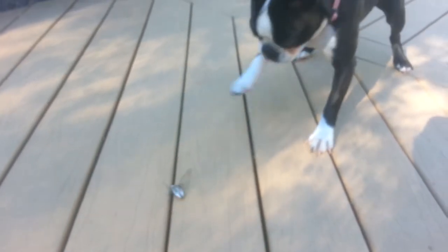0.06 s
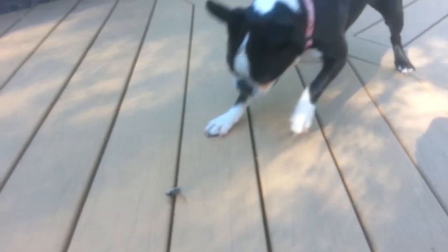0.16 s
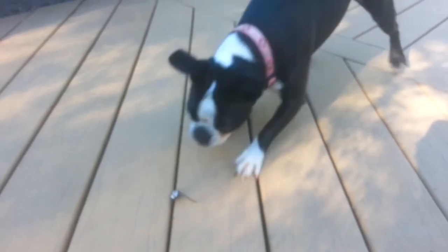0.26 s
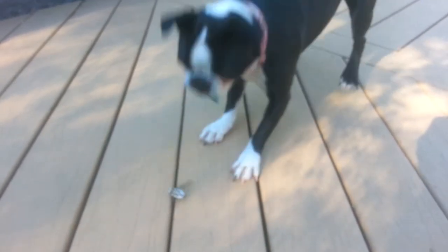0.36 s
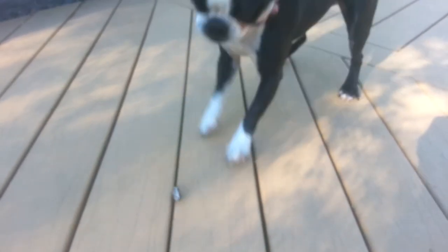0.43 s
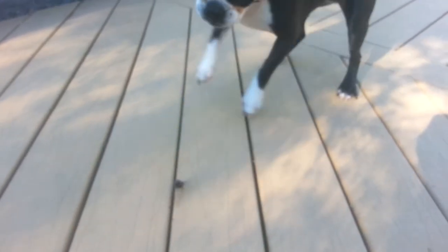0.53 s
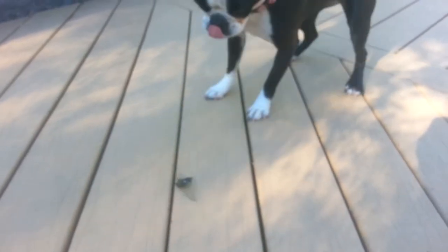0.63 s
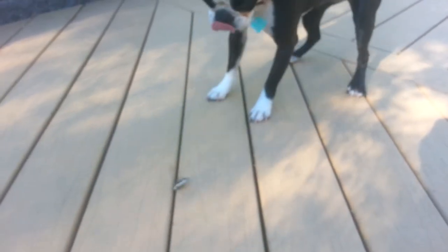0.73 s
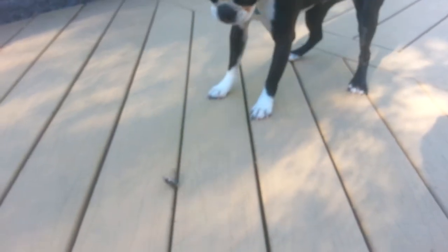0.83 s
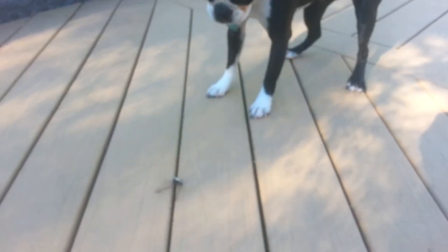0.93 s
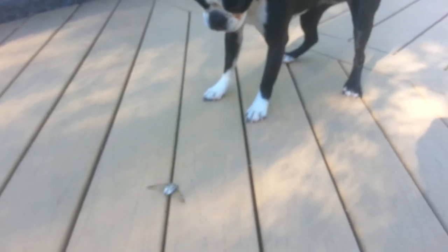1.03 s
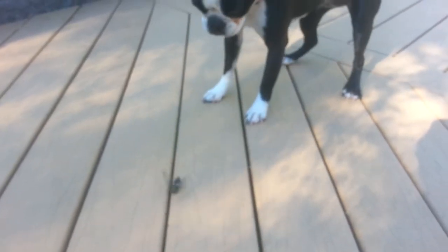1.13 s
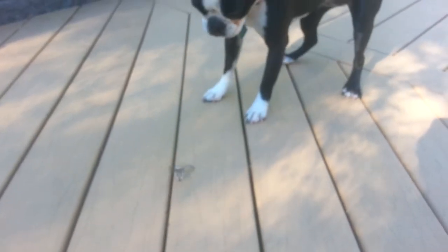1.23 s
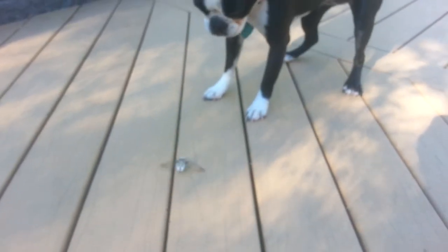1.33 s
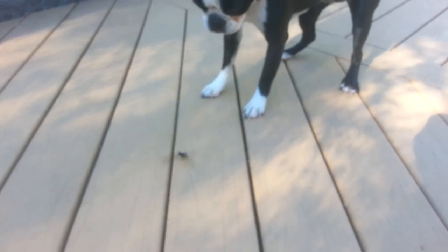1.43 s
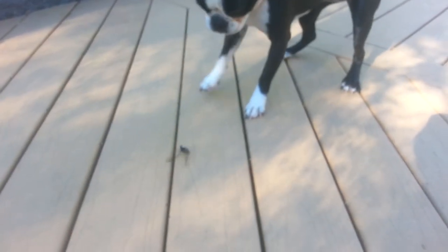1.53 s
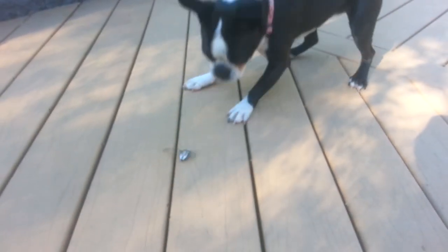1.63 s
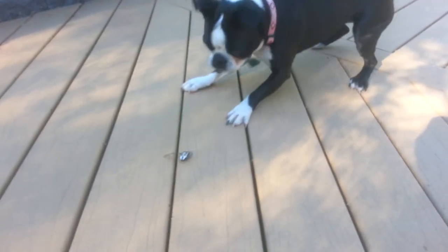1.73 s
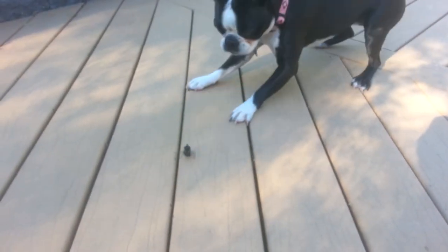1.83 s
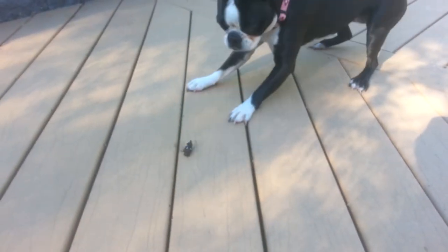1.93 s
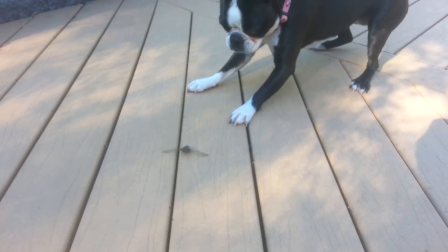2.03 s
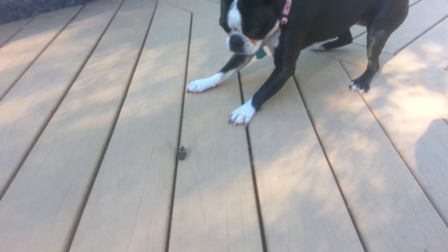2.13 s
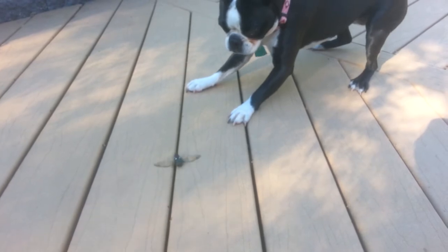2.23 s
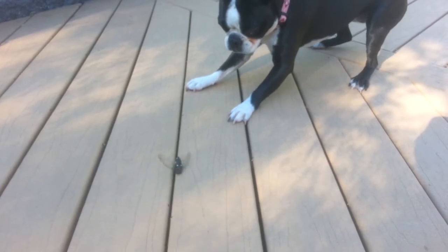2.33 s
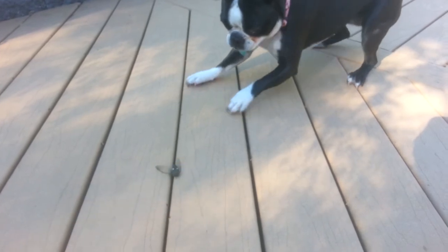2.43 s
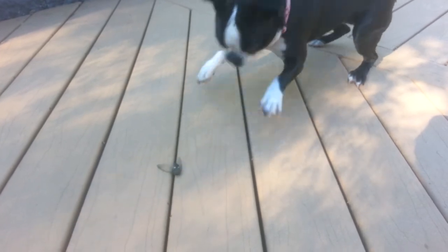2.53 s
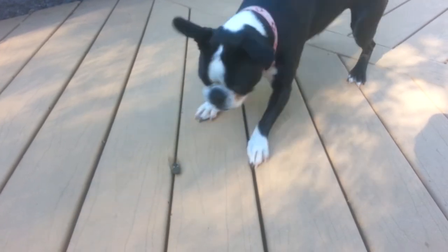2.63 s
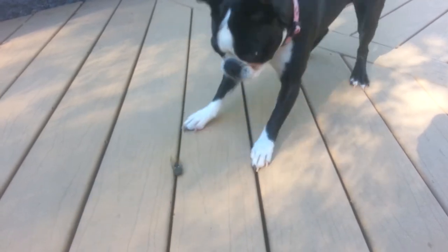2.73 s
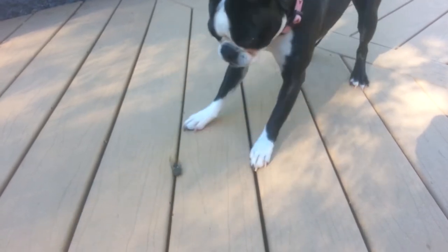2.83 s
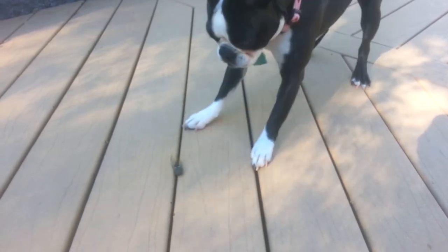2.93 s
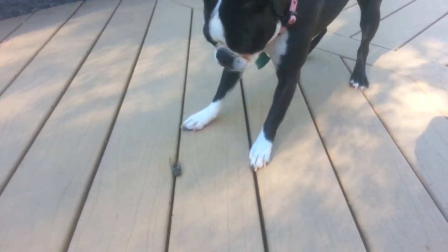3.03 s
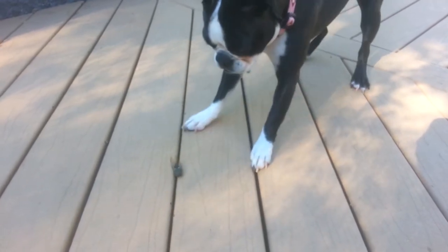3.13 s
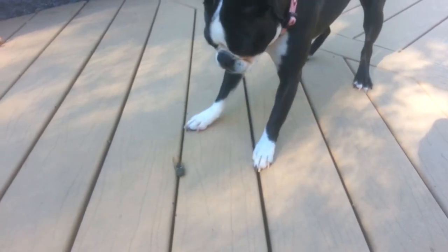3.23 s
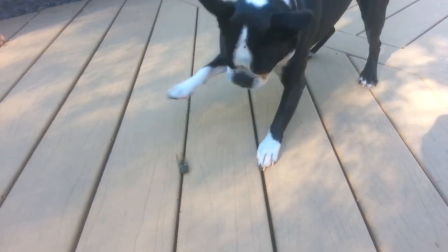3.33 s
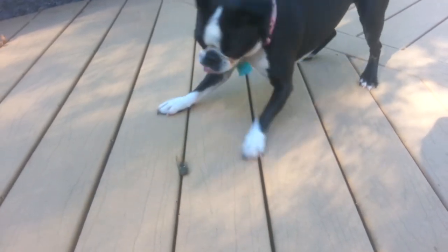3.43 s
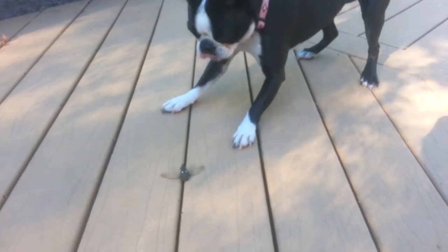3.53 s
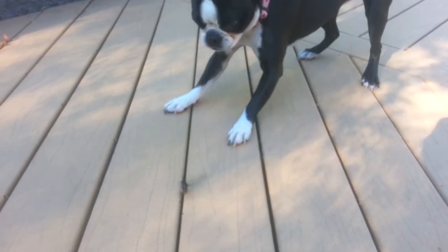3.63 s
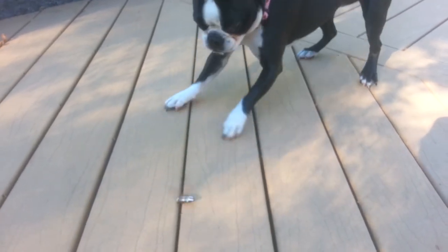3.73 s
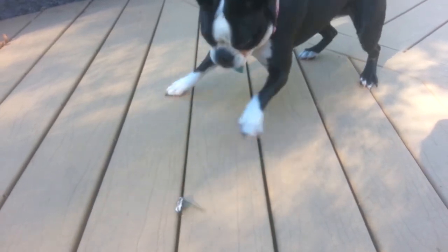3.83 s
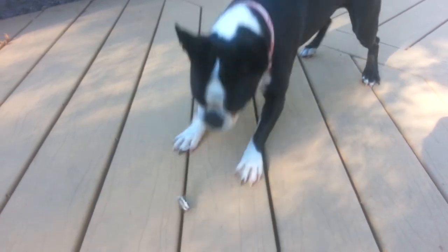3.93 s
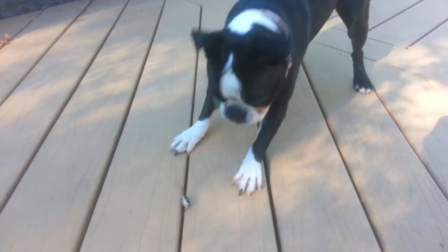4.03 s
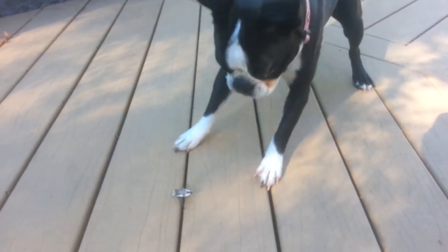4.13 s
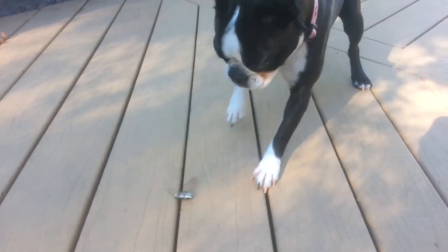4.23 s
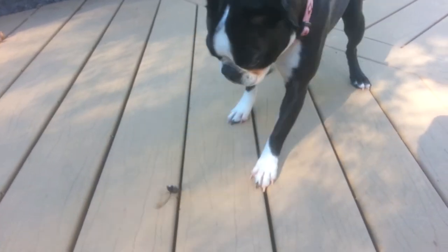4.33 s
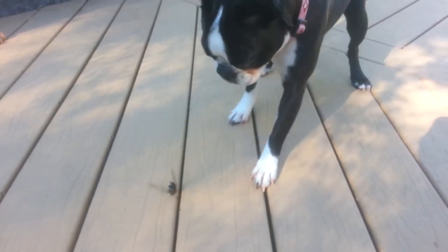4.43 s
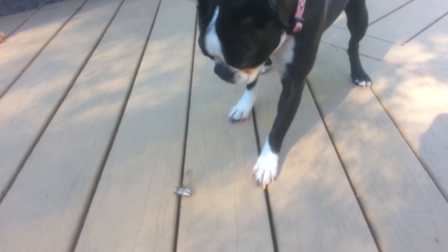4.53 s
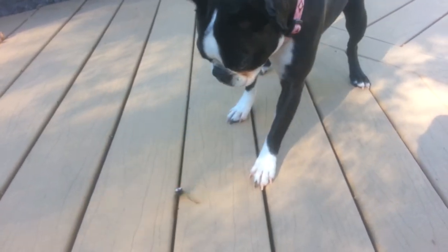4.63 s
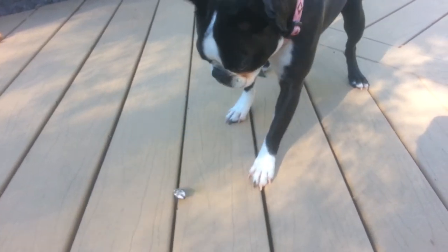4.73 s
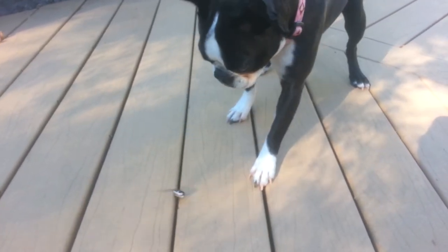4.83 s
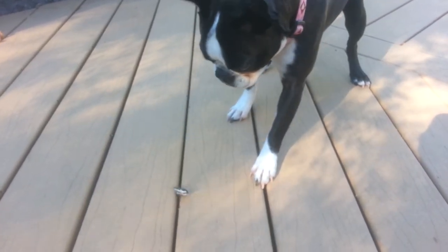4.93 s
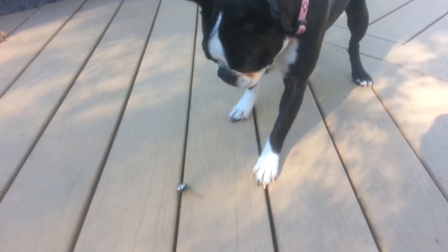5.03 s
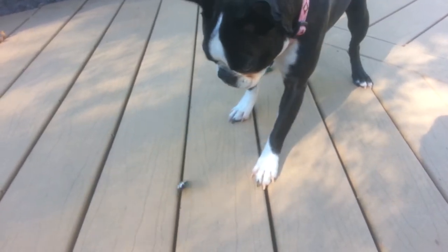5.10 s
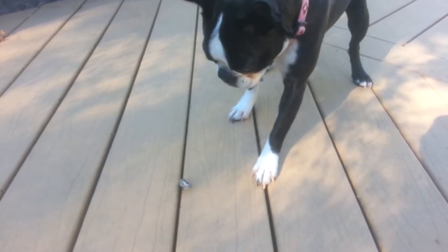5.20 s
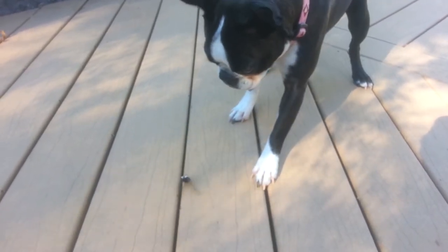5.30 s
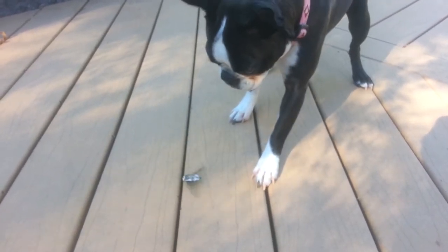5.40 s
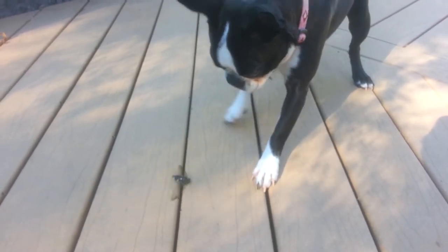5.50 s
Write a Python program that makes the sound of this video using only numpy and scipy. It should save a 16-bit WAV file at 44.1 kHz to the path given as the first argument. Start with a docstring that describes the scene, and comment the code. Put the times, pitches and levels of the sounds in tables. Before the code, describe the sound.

Close by on an outdoor wooden deck, a dog pounces in short bursts: claws click, boards thud, pads scuff and metal collar tags clink. Between the landings a cicada scrabbles and flicks its dry wings against the wood. After the heaviest landing, the insect fires a brief, loud run of sharp clicks, then rustles on and fades. Soft air and distant insects continue underneath.

```python
"""A dog pounces at a cicada on a wooden deck: claws click, boards thud, pads scuff, collar tags jingle.
From 0.5 s the cicada scrabbles and flicks its wings against the wood.
The paws land again near 1.6, 2.6, 3.4 and 4 s. Pawed, the cicada fires nine tymbal clicks from 4.1 s,
then brushes and rustles on, fading. Soft outdoor air and far insects sound throughout."""
import sys
import numpy as np
from scipy import signal
from scipy.fft import rfft, irfft
from scipy.io import wavfile

SR = 44100
rng = np.random.default_rng(int(sys.argv[2]) if len(sys.argv) > 2 else 0)


def int16_out(signal):
    """Quantize to a 16-bit WAV file."""
    q = np.round(np.clip(np.atleast_2d(signal).T, -1, 1) * 32767)
    wavfile.write(sys.argv[1], SR, q.astype(np.int16))


N = 245195

# spectrum of a dry wing on wood: (frequency [Hz], level [dB])
WING_SPECTRUM = [(200, -15), (700, 1.5), (1300, 2.5), (2300, -2), (3500, 9), (5000, 3.5), (7500, -1),
                 (10000, -3.5), (12500, 0), (14500, 2)]
# likeness of left and right for close sounds: (frequency [Hz], coherence [0-1])
NEAR_COHERENCE = [(60, 1), (650, 0.98), (1400, 0.48), (3000, 0.2), (7000, 0.16)]
ABDOMEN_HZ, BAND_EDGE_HZ = 3490, 14850


def paws(soften_db_per_oct=2, settle_s=.024, settle_db=-8, skid_s=.022, left_db=3):
    """Each landing: the claws crack, the plank thuds, the weight settles with a duller thud, the paw skids."""
    # (time [s], claw level [dB], claw treble [dB], thud level [dB], hardness [dB/octave], skid level [dB])
    landings = [(0.0291, -42.5, 1.5, -56, 1.5, -57), (0.0799, -29, -4, -47, 1, -49),
                (0.1363, -18.5, -7, -25.5, 13, -41.5), (0.194, -25, -12.5, -36.5, 4, -46),
                (0.2812, -26, -7.5, -30, 5, -34.5), (0.3271, -43, -19, -31, 4, -50),
                (0.3968, -38, -6.5, -57, 2, -53), (0.4193, -25, -19.5, -39.5, 4.5, -39.5),
                (0.6182, -25.5, -13, -40.5, -1, -40.5), (1.6392, -27, -8.5, -33, 4, -39.5),
                (1.7263, -25.5, -13, -33.5, 8.5, -48), (2.6135, -26.5, -7, -29.5, -1.5, -40),
                (2.6217, -25, -12, -25.5, 1, -32.5), (2.735, -26, -49, -38, 7.5, -51),
                (3.3498, -39.5, -12.5, -47.5, 4, -49), (3.4246, -21.5, -9.5, -26, 5, -41),
                (3.9575, -40.5, -6, -33, 4, -35), (3.9928, -21.5, -11, -18, 8.5, -36.5),
                (4.1055, -30.5, -10, -35.5, -7, -41), (4.1732, -39, 3, -39.5, 4.5, -47)]
    # harder landings knock deeper: (hardness [dB/octave], frequency [Hz])
    knock_pitch = [(2.5, 3570), (7, 1400)]
    contacts, planks = np.zeros((2, 2, N))
    for s, claw_db, treble_db, thud_db, hardness, skid_db in landings:
        knock_hz = np.interp(hardness, *np.transpose(knock_pitch))
        tilt = hardness - soften_db_per_oct
        add(contacts, s, gain_of(claw_db) * claw(treble_db, knock_hz))
        add(planks, s, gain_of(thud_db) * board(tilt))
        add(planks, s + settle_s, gain_of(thud_db + settle_db) * board(tilt - 3.5))
        offset_s, skid = scuff(rise_s=.01, fall_s=.038, treble_db=-11.5, rasp_hz=knock_hz, rasp_db=1)
        add(contacts, s + skid_s + offset_s, gain_of(skid_db) * skid)
    return panned(contacts, left_db) + planks


def claw(treble_db, knock_hz, crack_s=.0061, rattle_db=-16, rattle_s=.01, knock_db=3.5):
    """A hard claw cracks on wood, with a hollow knock and a short rattle."""
    # claw on wood: (frequency [Hz], level [dB])
    spectrum = [(250, -18.5), (600, -9), (1100, -7.5), (1600, -0.5), (2600, -3), (3700, 1.5), (4700, -4.5),
                (7000, -6.5), (10000, -13), (14500, -18.5)]
    t = np.arange(SR // 10) / SR
    envelope = np.exp(-t / crack_s) + gain_of(rattle_db) * np.exp(-t / rattle_s)
    noise = rng.standard_normal((2, len(t))) * envelope
    crack = coloured(noise, spectrum, treble_db, (knock_hz, knock_db), ripple_db=2.5)
    return as_hit(left_late(paired(crack, NEAR_COHERENCE))) * np.hypot(1, gain_of(treble_db))


def board(tilt_db_per_oct, detune=.041):
    """Bending waves in a plank: the high ones arrive first, the low ones build up late."""
    # plank modes: (frequency [Hz], level [dB], t60 [s])
    modes = [(81, -15, 0.29), (121.2, -4.5, 0.23), (147, 1.5, 0.21), (177.9, -2.5, 0.24),
             (195.4, 0.5, 0.15), (245, 0, 0.12), (296.4, -5, 0.26), (355, 1, 0.12), (422, 0, 0.09),
             (464.2, 3.5, 0.1), (520.7, 2, 0.11), (576.5, -1, 0.083), (660, -6, 0.06), (795, -13.5, 0.098)]
    hz, db, t60_s = np.transpose(modes)[:, :, None]
    hz = hz * (1 + detune * rng.uniform(-1.02, 1, hz.shape))
    t = np.arange(SR // 5) / SR
    build_s = 20 / hz ** 1.5
    onset = 1 - np.exp(-(t / build_s) ** 2)
    decay = gain_of(db + tilt_db_per_oct * np.log2(hz) - 60 * t / t60_s)
    ringing = onset * decay * np.exp(2j * np.pi * hz * t)
    phase = 2 * np.pi * rng.random(len(hz)) + .2 * rng.standard_normal((2, len(hz)))
    return as_hit((np.exp(1j * phase) @ ringing).real)


def scuffs(left_db=2.5):
    """Pads and claws drag over the wood; each stroke rasps at its own pitch."""
    # (peak time [s], rise [s], level [dB], treble [dB], rasp frequency [Hz], rasp height [dB])
    drags = [(.58, .022, -34.5, -7.5, 2080, 6), (.625, 0.026, -29.5, -3.5, 2600, 6),
             (1.642, .015, -31.5, -5.5, 3700, -5), (1.709, 0.018, -24.5, -16.5, 2730, 13.5),
             (2.455, 0.023, -32.5, -19.5, 860, 3.5), (2.518, 0.0092, -32.5, -27, 3150, 9),
             (2.70, 0.03, -32.5, -14, 3630, -5), (2.742, 0.0085, -31, -26, 1510, 10),
             (3.41, 0.019, -36.5, -3.5, 3500, 1), (3.485, .045, -33, -11, 3500, 3),
             (3.831, 0.028, -25, -13.5, 2140, 3), (3.896, 0.0071, -38, -12, 3020, 17),
             (4.051, 0.0066, -24.5, -19, 2680, 14.5), (4.159, 0.034, -36.5, -2, 2260, 15)]
    out = np.zeros((2, N))
    for s, rise_s, db, treble_db, rasp_hz, rasp_db in drags:
        offset_s, rub = scuff(rise_s, 1.05 * rise_s, treble_db, rasp_hz, rasp_db)
        add(out, s + offset_s, gain_of(db) * rub)
    return panned(out, left_db)


def scuff(rise_s, fall_s, treble_db, rasp_hz, rasp_db):
    """One slide over the grain; returns its start relative to the peak [s] and its sound."""
    # pad on wood: (frequency [Hz], level [dB])
    spectrum = [(45, -25), (90, -10), (160, -3.5), (450, 0.5), (900, -2), (1700, 1.5), (2600, -2.5),
                (3700, 4), (4800, -1), (7500, -8), (10500, -13.5), (14500, -18)]
    t, grain = friction(rise_s, fall_s, slips_per_s=2500, spread_db=1.5, hiss=.85)
    rub = coloured(grain, spectrum, treble_db, (rasp_hz, rasp_db), ripple_db=4)
    rub = left_late(paired(rub, NEAR_COHERENCE))[:, :len(t)]
    return t[0], unit_rms(rub) * swell(t, rise_s, fall_s)


def tymbal(start_s=4.0906, period_s=.02965, hesitate_s=.01345, slowing_s=.00705, count=9,
           pitch_spread=.035, right_db=-5, back_s=.0052, back_db=-11):
    """The tymbal buckles and rings the hollow abdomen, then springs back with a weaker, sharper click."""
    # swell of a buckling click, rows left and right: (time [s])
    buckle_s = np.array([[.00082], [.00058]])
    # a hesitant first click, a steady run, then slower and weaker as the muscle lets go
    k = np.arange(count)
    slowing = np.cumsum(np.maximum(k - 6, 0) ** 2)
    times_s = start_s + period_s * k + hesitate_s * (k > 0) + slowing_s * slowing
    levels_db = .4 - .7 * abs(k - 2)
    out = np.zeros((2, N))
    for s, db, (late, size, detune, pitch) in zip(times_s, levels_db, rng.uniform(-1, 1, (count, 4))):
        hz = ABDOMEN_HZ * (1 + pitch_spread * pitch)
        buckle = tymbal_click(hz, buckle_s, plate_db=-20)
        add(out, s - buckle_s[1, 0], gain_of(db) * gain_of([[0], [right_db]]) * buckle)
        back = tymbal_click(hz * (1.04 + .069 * detune), build_s=.00044, plate_db=-3)
        add(out, s + back_s + .00048 * late, gain_of(db + back_db + 2 * size) * back)
    # so small a body radiates almost nothing below its resonance
    return signal.sosfilt(signal.butter(10, 2950, "highpass", fs=SR, output="sos"), out)


def tymbal_click(hz, build_s, plate_db, plate_hz=4600, ring_db=-26, ring_s=.0041,
                 rasp_db=-28, rasp_s=.0064):
    """The abdomen's tone swells in a few cycles, with the plate's higher tone and the ribs' dry rasp."""
    # tymbal ribs: (frequency [Hz], level [dB])
    rib_spectrum = [(1000, -28), (2600, -5), (3300, 24.5), (4900, 14), (6500, 4.5), (14500, -13)]
    t = np.arange(SR // 30) / SR
    u, stereo_phase = t / build_s, np.array([[0], [1.9]])
    pulse = (u * np.exp(1 - u)) ** 3
    ring = gain_of(ring_db) * (1 - np.exp(-u)) * np.exp(-t / ring_s)
    tone = (pulse + ring) * np.sin(2 * np.pi * hz * t + stereo_phase)
    plate_cycles = plate_hz * rng.uniform(.94, 1.06) * t + rng.random()
    plate = pulse * np.sin(2 * np.pi * plate_cycles + stereo_phase)
    rasp = coloured(rng.standard_normal((2, len(t))) * np.exp(-t / rasp_s), rib_spectrum)[:, :len(t)]
    return tone + gain_of(plate_db) * plate + gain_of(rasp_db) * rasp


def wings(rise_s=.006, fall_s=.0091, left_db=2):
    """The cicada's single wing beats: sharp snaps and softer brushes."""
    # snaps on the boards: (time [s], level [dB], treble [dB])
    snaps = [(0.551, -41, 15), (0.678, -38, 3), (0.7339, -40.5, 3), (0.8473, -36.5, 13.5),
             (0.891, -37.5, 2), (0.9186, -39, 4), (1.1937, -43, 7), (1.4, -36.5, -4.5), (1.4376, -35, -5),
             (1.932, -42, -1.5), (2.1, -43.5, 2.5), (2.1415, -34, 0.5), (2.1799, -29.5, 6.5),
             (2.2128, -29.5, -1), (2.254, -34, 0.5), (2.315, -27.5, 4.5), (3.5565, -28.5, 3.5),
             (3.5954, -26.5, 7.5), (3.635, -29, 3), (3.716, -37.5, 4), (3.7407, -30.5, 2),
             (4.3996, -35.5, 2), (4.6292, -30.5, -1)]
    # brushes along the wood: (peak time [s], level [dB])
    brushes = [(1.108, -43), (1.83, -41), (2.321, -34.5), (3.655, -37), (4.225, -40), (4.34, -33),
               (4.47, -39), (4.636, -29), (4.8, -36), (5.069, -38), (5.34, -45), (5.555, -35)]
    out = np.zeros((2, N))
    for s, db, treble_db in snaps:
        add(out, s, gain_of(db) * flick(treble_db))
    for s, db in brushes:
        t, crackle = rustle(rise_s, fall_s)
        add(out, s + t[0], gain_of(db) * crackle * swell(t, rise_s, fall_s))
    return panned(out, left_db)


def flick(treble_db, splinter_s=.0006, splinter_db=-11, shiver_db=-36, shiver_s=.0081, body_db=2):
    """A stiff dry wing snaps on the boards, one tick and its splinters, and rings the abdomen."""
    t = np.arange(SR // 20) / SR
    splinters = paired(rng.laplace(size=(2, len(t))), NEAR_COHERENCE)
    snap = (t == 0) + gain_of(splinter_db) * splinters * t / splinter_s * np.exp(-t / splinter_s)
    shiver = rng.standard_normal((2, len(t))) * gain_of(shiver_db) * np.exp(-t / shiver_s)
    tick = coloured(snap + shiver, WING_SPECTRUM, treble_db, (ABDOMEN_HZ, body_db), ripple_db=3.5)
    return as_hit(left_late(tick))


def struggles(fitful_db=4.5, edge_s=.02, ticks_per_s=14, left_db=1):
    """The cicada scrabbles on its back: a fitful rustle with faint wing ticks at loose intervals."""
    # (start [s], end [s], level [dB])
    spells = [(.45, .93, -48.5), (1.1, 1.477, -62), (3.55, 3.772, -52), (4.13, 4.35, -41),
              (4.779, 5.22, -55.5), (5.3, 5.499, -52)]
    out = np.zeros((2, N))
    for start_s, end_s, db in spells:
        half_s = (end_s - start_s) / 2
        t, crackle = rustle(half_s / 2, half_s / 2)
        fits = unit_rms(sum(np.sin(2 * np.pi * (hz * t + rng.random())) for hz in np.geomspace(6, 30, 8)))
        gate = np.clip((half_s - abs(t)) / edge_s + .5, 0, 1)
        add(out, start_s + half_s + t[0], gain_of(db + fitful_db * fits) * gate * crackle)
        for s in np.arange(start_s, end_s - .5 / ticks_per_s, 1 / ticks_per_s):
            tick = gain_of(db + rng.uniform(-3.5, 8)) * flick(treble_db=-1)
            add(out, s + rng.random() / ticks_per_s, tick)
    return panned(out, left_db)


def rustle(rise_s, fall_s):
    """Wings and legs crackle on wood; returns the time axis [s] and the sound at an even level."""
    t, grain = friction(rise_s, fall_s, slips_per_s=1200, spread_db=2, hiss=.66)
    crackle = paired(coloured(grain, WING_SPECTRUM, ripple_db=.5), NEAR_COHERENCE)
    return t, unit_rms(left_late(crackle)[:, :len(t)])


def collar_tags(bounces=5, bounce_s=.0032, spread_db=3, tick_db=-8, tick_s=.0004,
                free_db=-28, muffle_s=.0055):
    """Small metal discs touch and chatter; every bounce rings their modes anew."""
    # (time [s], level [dB])
    knocks = [(0.086, -28), (0.101, -29), (0.467, -40), (1.613, -45), (1.634, -34), (2.7458, -32.5),
              (2.757, -28.5), (2.853, -41.5), (2.951, -42), (3.323, -43.5), (4.128, -35), (4.175, -31.5)]
    # discs damped by fur: (frequency [Hz], level [dB], t60 [s])
    modes = [(6205, -6, .06), (7700, -19, .04), (8745, 0, .042), (8710, -23, .3), (12500, -21, .04),
             (14250, -4, .04), (14080, -4, .025)]
    out, t = np.zeros((2, N)), np.arange(SR // 5) / SR
    hz, db, t60_s = np.transpose(modes)[:, :, None]
    for s, hit_db in knocks:
        # after a light touch the discs stay together: less bounce, muffled modes, the lowest most
        contact = np.clip(1 - gain_of(hit_db - free_db), 0, 1)
        mode_db = db - 9 * contact * (hz == hz.min()) - 60 * t / t60_s
        ringing = gain_of(mode_db) * np.exp(2j * np.pi * hz * t - contact * t / muffle_s)
        db_per_bounce = -1.5 - 7 * contact
        chatter, delay_s = np.zeros((2, len(t))), 0
        for bounce in range(bounces):
            strength = gain_of(spread_db * rng.standard_normal((2, len(hz))))
            phasor = np.exp(2j * np.pi * rng.random((2, len(hz))))
            tick = np.diff(rng.standard_normal((2, len(t) + 1))) * np.exp(-t / tick_s)
            touch = as_hit(((strength * phasor) @ ringing).real) + gain_of(tick_db) * as_hit(tick)
            add(chatter, delay_s, gain_of(db_per_bounce * bounce) * touch)
            delay_s += bounce_s * rng.uniform(.5, 1.5)
        add(out, s, gain_of(hit_db) * as_hit(chatter))
    return out


def yard_echoes(x, first_s=.0018, echoes_per_s=3000):
    """Short scattered echoes from railing and house wall."""
    # echo decay: (frequency [Hz], t60 [s])
    decay = [(200, 0.34), (1000, 0.28), (4000, 0.11), (14000, 0.091)]
    size = SR // 3
    taps = rng.choice([-1., 1.], (2, size)) * (rng.random((2, size)) < echoes_per_s / SR)
    taps *= np.arange(size) > first_s * SR
    hz, t, bands = signal.stft(taps, SR, nperseg=128)
    tail = signal.istft(bands * gain_of(-60 * t / curve_at(decay, hz)[:, None]), SR, nperseg=128)[1]
    return signal.fftconvolve(x, tail / np.linalg.norm(tail[0]), axes=1)[:, :N]


def garden(air_db=-55, waver_db=1, chorus_db=-56.5):
    """Soft, wavering outdoor air and the narrow hiss of a distant insect chorus."""
    # air and insects: (frequency [Hz], level [dB])
    air_spectrum = [(25, -30), (45, -14), (75, -4), (150, -1.5), (380, -3.5), (630, -4), (950, -9.5),
                    (1800, -12), (2700, -17.5), (3500, -11), (4400, -20.5), (6500, -29), (9000, -20),
                    (14500, -30.5)]
    chorus_spectrum = [(3800, -26), (4700, -7.5), (5120, 6.5), (5500, -4.5), (6400, -16.5)]
    # likeness of left and right: (frequency [Hz], coherence [0-1])
    air_coherence = [(60, 0.33), (600, 0.4), (2000, 0.097), (15000, 0.044)]
    t = np.arange(N) / SR
    drift = sum(np.sin(2 * np.pi * (hz * t + rng.random())) / np.sqrt(hz) for hz in np.geomspace(.4, 12, 12))
    air = paired(steady_noise(air_spectrum), air_coherence)
    chorus = panned(steady_noise(chorus_spectrum), left_db=-3)
    return gain_of(air_db + waver_db * unit_rms(drift)) * air + gain_of(chorus_db) * chorus


def steady_noise(spectrum):
    """Stereo noise of a given spectrum at unit RMS."""
    gain = gain_of(curve_at(spectrum, np.fft.rfftfreq(N, 1 / SR)))
    return unit_rms(irfft(rfft(rng.standard_normal((2, N))) * gain, N))


def friction(rise_s, fall_s, slips_per_s, spread_db, hiss):
    """Tiny slips over a smooth hiss, long enough for one swell; returns the time axis [s] and the noise."""
    t = np.arange(-4 * rise_s, 5 * fall_s, 1 / SR)
    slipping = rng.random(len(t)) < slips_per_s / SR
    slips = slipping * gain_of(spread_db * np.minimum(rng.exponential(1, len(t)), 4))
    return t, unit_rms(np.hypot(unit_rms(slips), hiss) * rng.standard_normal((2, len(t))))


def swell(t, rise_s, fall_s):
    """Envelope that peaks at t = 0."""
    return np.exp(-abs(t / np.where(t < 0, rise_s, fall_s)) ** 1.32)


def coloured(x, spectrum, treble_db=None, peak=(1000, 0), ripple_db=0, size=2048):
    """Causal filter with a peak (Hz, dB) and ripples; a shelf sets treble (6-15 kHz) over body (1-5 kHz)."""
    hz = abs(np.fft.fftfreq(size, 1 / SR)) + 1
    knots_hz = np.arange(0, SR, 220)
    ripple = np.interp(hz, knots_hz, rng.standard_normal(len(knots_hz)))
    peak_hz, peak_db = peak
    db = curve_at(spectrum, hz) + peak_db / (1 + (np.log2(hz / peak_hz) / .2) ** 2) + ripple_db * ripple
    if treble_db is not None:
        power = gain_of(db) ** 2
        treble, body = power[(hz > 6000) & (hz < 15000)].sum(), power[(hz > 1000) & (hz < 5000)].sum()
        shelf = np.clip(np.log2(hz / 4200) * 1.5, 0, 1)
        db += (treble_db - 10 * np.log10(treble / body)) * shelf
    db -= np.clip(hz - BAND_EDGE_HZ, 0, 3000) / 100
    minimum_phase = np.exp(np.conj(signal.hilbert(np.log(gain_of(db)))))
    taps = np.fft.ifft(minimum_phase).real
    return signal.fftconvolve(x, taps[None, :size // 2], axes=1)


def paired(x, coherence):
    """Makes two unrelated channels alike where the waves are long."""
    same = curve_at(coherence, np.fft.rfftfreq(x.shape[1], 1 / SR))
    left, right = rfft(x)
    return irfft(np.array([left, same * left + np.sqrt(1 - same ** 2) * right]), x.shape[1])


def left_late(x, lag_s=.00008):
    """Delays the left channel: the right microphone lies nearer to the deck."""
    lag = round(lag_s * SR)
    return np.array([np.pad(x[0], (lag, 0)), np.pad(x[1], (0, lag))])


def panned(x, left_db):
    """Places a sound left_db louder on the left than on the right."""
    return x * gain_of([[left_db / 2], [-left_db / 2]])


def add(mix, s, sound):
    """Mixes a stereo sound in at time s."""
    start = round(s * SR)
    part = mix[:, max(start, 0):max(start + sound.shape[1], 0)]
    part += sound[:, max(-start, 0):][:, :part.shape[1]]


def curve_at(points, hz):
    """Interpolates (frequency, value) points on a log-frequency axis."""
    knots_hz, values = np.transpose(points)
    return np.interp(np.log(hz + 1), np.log(knots_hz), values)


def as_hit(x):
    """Scales a blow to the energy of 10 ms at unit level."""
    return x / np.sqrt(np.mean(np.sum(x ** 2, -1)) / (SR / 100) + 1e-20)


def unit_rms(x):
    return x / np.sqrt(np.mean(x ** 2) + 1e-20)


def gain_of(db):
    return 10 ** (np.asarray(db) / 20)


def scene(echo_db=-13, tymbal_echo_db=-19):
    """Dog and cicada close by, their echoes, and the garden behind."""
    near = paws() + scuffs() + wings() + struggles() + collar_tags()
    clicks = tymbal()
    echoes = yard_echoes(gain_of(echo_db) * near + gain_of(tymbal_echo_db) * clicks)
    return near + clicks + echoes + garden()


def record(dry):
    """The recorder rounds off the loudest peaks, then limits the band."""
    rounded = 1.5 * np.tanh(dry / 1.5)
    lowpass = signal.firwin(161, BAND_EDGE_HZ, window=("kaiser", 8), fs=SR)
    return signal.oaconvolve(rounded, lowpass[None], "same")


dry = scene()
out = record(dry)
int16_out(out)
```